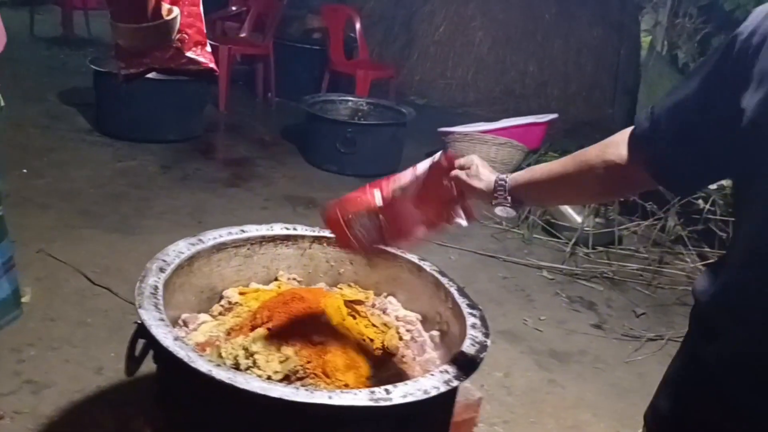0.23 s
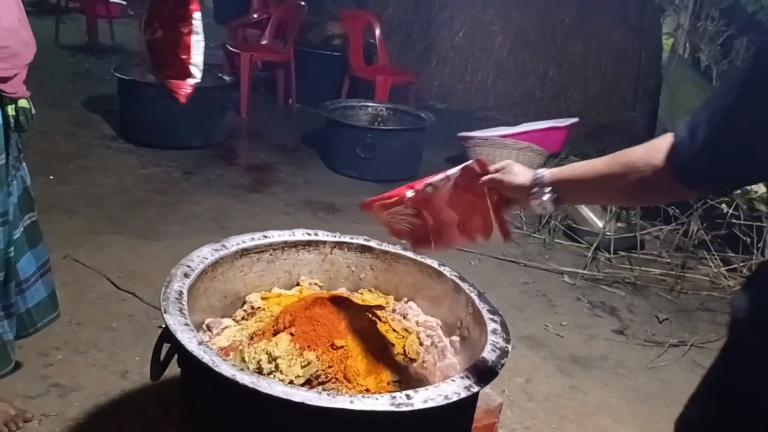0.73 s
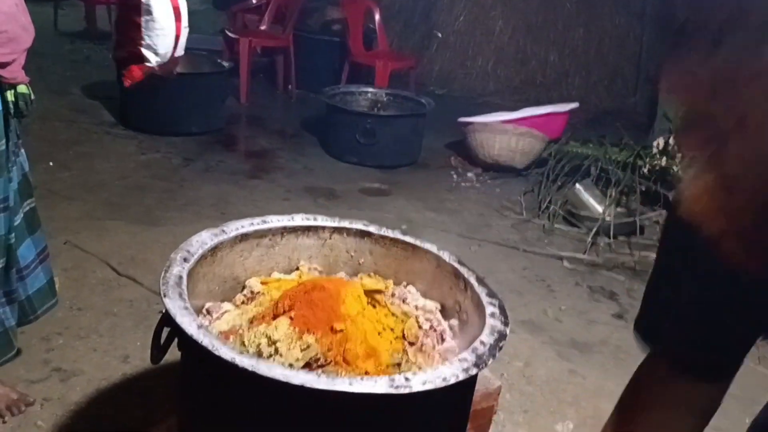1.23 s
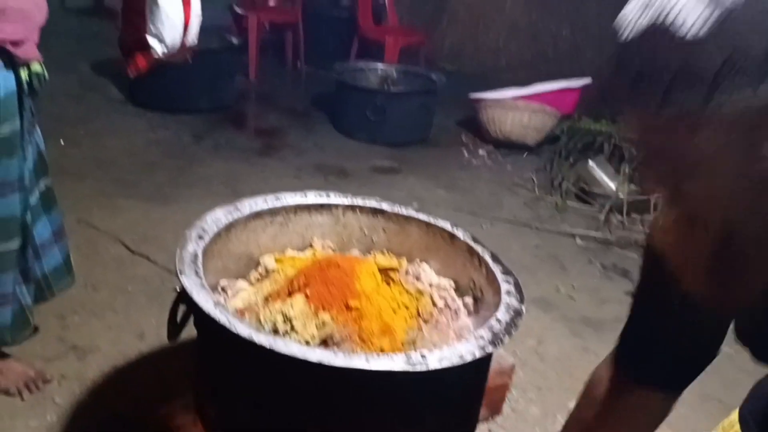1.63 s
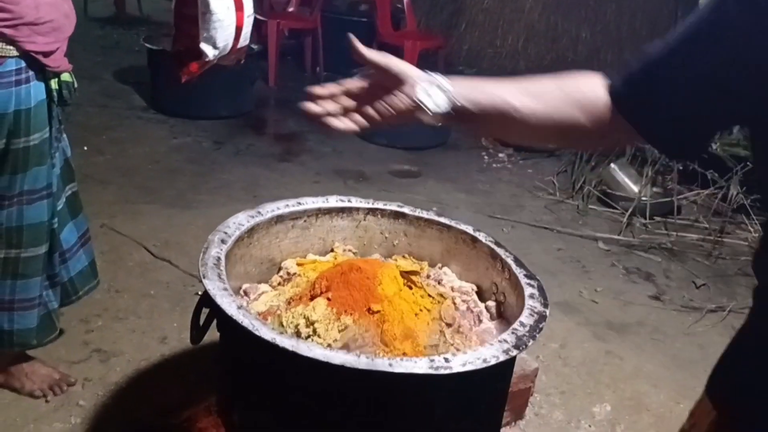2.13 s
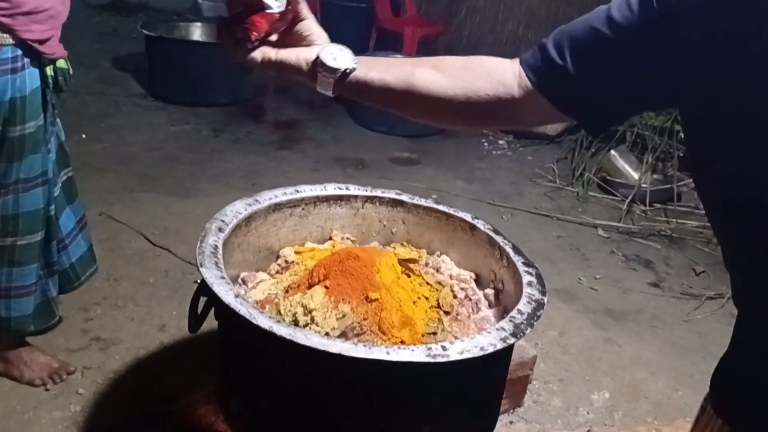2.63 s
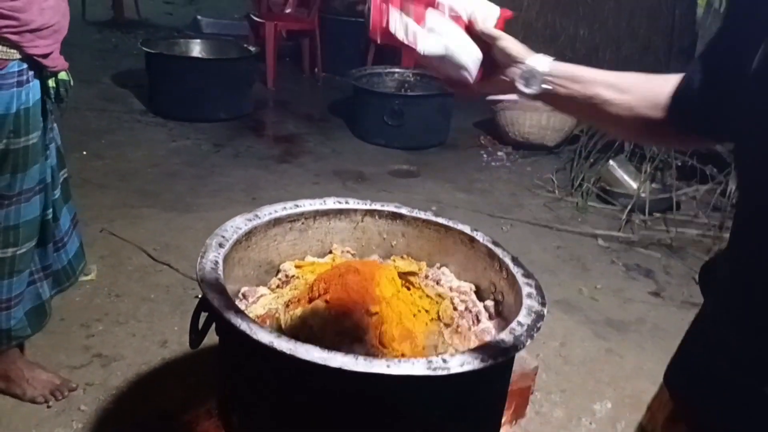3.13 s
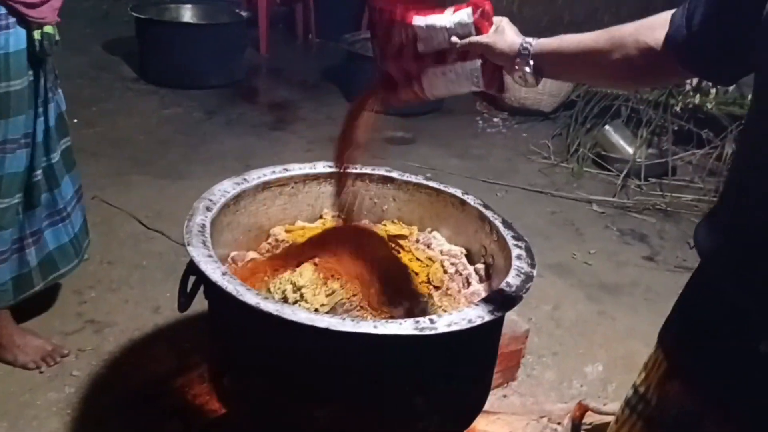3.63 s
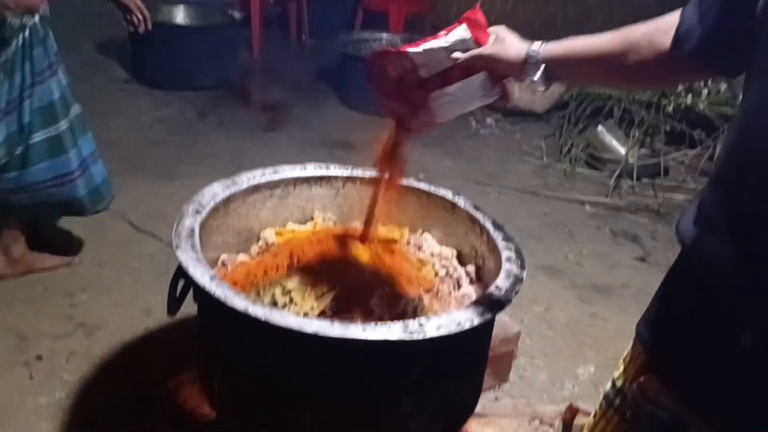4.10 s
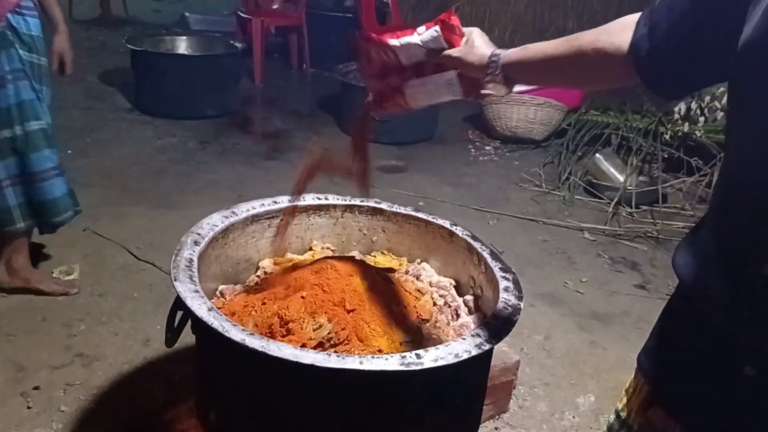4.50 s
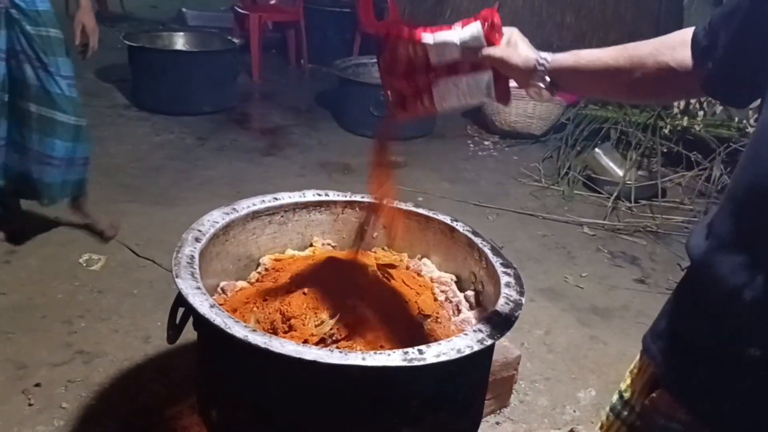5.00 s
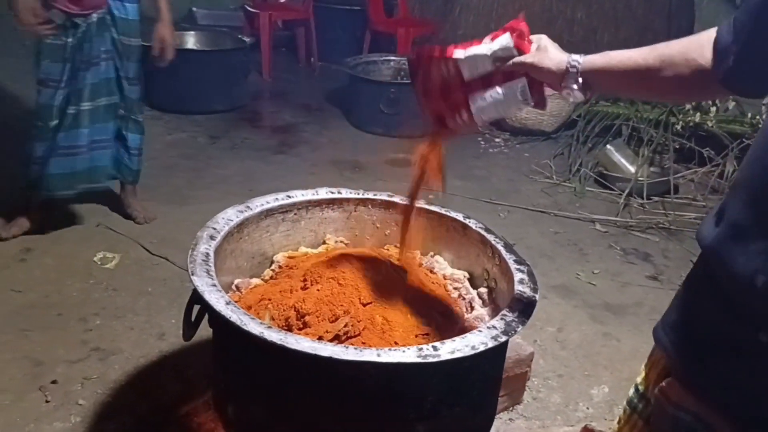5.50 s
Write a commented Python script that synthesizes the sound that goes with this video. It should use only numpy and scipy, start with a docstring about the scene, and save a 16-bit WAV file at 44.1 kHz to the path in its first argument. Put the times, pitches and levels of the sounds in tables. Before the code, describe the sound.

A quiet outdoor yard at night, heard from close up and nearly dry. From 0 to 1 second an empty plastic packet is shaken: papery rubbing and flapping, brisk swishes and faint air puffs around 0.4 to 0.5, a strong crumple near 0.28 and crisp creases snapping at about 0.13, 0.5 to 0.6 and 0.8. It fades by 1.1, leaving a low, uneven fire murmur and small woody pops. At 1.6 the packet slaps the ground in a very quick, bright run of hits, by far the loudest event, with a brief skid, film cracks and tiny spring-back rustles until 1.7. Then only sparse faint crinkles: a fuller packet is handled from 2.7 and emptied, with light ticks, the clearest at 3.55 and 4.0. Soft dull bumps come at about 3.6 and 4.1, and pops continue. Very faint, high, pulsing insect chirps come at 2.1 to 2.8 and from 5.4 to the end.

```python
"""Spice packets at the cooking fire

An empty plastic packet is shaken and slapped down on the ground; a second, full one is picked up and poured.
Film noise is showers of tiny random clicks through the colours of the film; the slaps add arches and fading sines.
Outdoors at night, behind: a murmur of shaped noise and soft crackles for the fire, small pops, dull bumps,
and an insect whose chirps, in two bouts, are sines pulsed by wing strokes. A short scatter joins the near sounds."""
import sys
import numpy as np
from scipy import signal
from scipy.fft import rfft, irfft
from scipy.io import wavfile
from scipy.ndimage import uniform_filter1d

SR = 44100
rng = np.random.default_rng(int(sys.argv[2]) if len(sys.argv) > 2 else 0)


def waveform_to_disk(signal):
    """Save audio, clipped to [-1, 1], as 16-bit WAV at the path in sys.argv[1]."""
    frames = np.transpose(np.atleast_2d(signal))
    scaled = np.clip(frames, -1, 1) * 32767
    samples = np.round(scaled).astype(np.int16)
    wavfile.write(sys.argv[1], SR, samples)


N = 253575

# Effort of shaking the empty packet, before the balance of its layers: (time [s], level [dB])
SHAKE_EFFORT = [(0, -78), (.12, -58), (.23, -68), (.31, -59.5), (.42, -57), (.56, -55), (.63, -61),
                (.70, -57), (.76, -68), (.85, -54), (.94, -65.5), (1.1, -97)]
# Turns of the wrist, the walls swish together, before trims:
# (time [s], body level [dB], body pitch [Hz], fizz level [dB], fizz pitch [Hz])
WRIST_SWISHES = [(.205, -54, 2520, -80.5, 12000), (.36, -48.5, 2800, -80, 11000),
                 (.425, -47, 2560, -74.5, 12000), (.492, -47.5, 2740, -73, 12700)]
# Air puffing out of the packet's mouth: (time [s], level [dB], pitch [Hz])
AIR_PUFFS = [(0.424, -61.5, 1130), (.505, -61.5, 900)]
# A single crease snaps through, levels before trims:
# (time [s], body level [dB], body pitch [Hz], fizz level [dB], fizz pitch [Hz], length [s])
CREASE_SNAPS = [(0.087, -58, 2530, -65.5, 13200, 0.0022), (0.1174, -51.5, 3860, -57, 10300, 0.0036),
                (0.1334, -39, 3270, -60.5, 10500, 0.0037), (0.504, -40, 2840, -73, 12000, 0.00093),
                (0.551, -43, 2880, -57.5, 13100, 0.0025), (0.5617, -36.5, 2950, -69, 12000, 0.0037),
                (0.575, -44.5, 1910, -75, 11000, 0.0011), (0.582, -45, 2320, -61, 9900, 0.002),
                (0.812, -45, 3440, -60, 10900, 0.0044), (0.874, -56, 2450, -67, 10800, 0.0025),
                (0.899, -53, 2240, -64, 10200, 0.002), (0.928, -52.5, 4300, -67, 9800, 0.0064),
                (1.021, -66, 4440, -59.5, 9900, 0.004), (1.523, -58, 2520, -75, 9000, 0.0021),
                (2.686, -64.5, 3300, -70.5, 9700, 0.0032), (3.008, -65, 3860, -52, 8830, 0.0011),
                (3.355, -60.5, 5480, -57.5, 8700, 0.0012), (3.551, -43, 4040, -63.5, 10200, 0.0014),
                (3.873, -53, 3160, -78, 9700, 0.0073), (4.005, -50, 1870, -76, 9860, 0.0038),
                (4.016, -46, 2180, -80, 11000, 0.00062), (4.303, -61.5, 2700, -69, 9220, 0.0021),
                (4.429, -51.5, 3600, -65, 8640, 0.0017), (4.523, -53.5, 2220, -69.5, 8600, 0.0026),
                (5.125, -55, 2960, -90, 9010, 0.0018)]
# The hand crumples a patch of film, levels before trims:
# (time [s], body level [dB], body pitch [Hz], fizz level [dB])
FILM_CRUMPLES = [(.257, -65, 3500, -74), (.275, -41, 3240, -62), (.285, -32, 2270, -60),
                 (.645, -59, 2870, -73), (.7, -53, 2500, -64.5), (.835, -59.5, 3380, -70),
                 (.946, -55, 4750, -71), (1.037, -68, 4900, -71), (2.661, -62, 2960, -75),
                 (2.885, -73.5, 5440, -82), (2.909, -69, 3080, -79), (2.986, -68.5, 2430, -74),
                 (3.328, -70.5, 3004, -81.5), (3.422, -70, 3360, -74.5), (3.615, -70.5, 3600, -80.5),
                 (3.796, -72, 5400, -84), (3.957, -65.5, 2730, -75.5), (4.071, -72.5, 5330, -90),
                 (4.223, -63, 3340, -75), (4.496, -69, 2800, -89)]
# Relative colour of the empty packet's film: (frequency [Hz], density [dB per Hz])
EMPTY_COLOUR = [(400, -20), (750, -16), (1100, -3), (1400, -15.5), (1800, -8.5), (2700, -4), (3900, -4.5),
                (4700, -5.5), (5150, -19), (5900, -16), (7500, -34.5), (16000, -63.5)]
# Relative colour of the full packet's film: (frequency [Hz], density [dB per Hz])
FULL_COLOUR = [(300, 2), (900, 5), (1900, 5), (2900, -1.5), (4000, 1.5), (5100, -9), (5900, -0.5),
               (7700, -22), (16000, -37)]
# Relative colour of the film's high fizz: (frequency [Hz], density [dB per Hz])
FIZZ_COLOUR = [(3000, -43.5), (5700, -12), (7800, -6.5), (8700, 0), (9700, 7), (10800, -1.5), (12500, -1.5),
               (15500, -10)]
# Resonances of the empty packet's hollow: (frequency [Hz], width [Hz], lift [dB])
HOLLOW_RESONANCES = [(1555, 230, 16), (1987, 190, 9.5), (2620, 49, 5.5), (3250, 200, 5.5)]
# The packet hits the ground and flops over: (time [s], level [dB], length [s])
GROUND_SLAPS = [(1.585, -36.5, 0.0025), (1.5904, -18.5, 0.0054), (1.5968, -18.5, 0.0074),
                (1.606, -28, 0.0072), (1.635, -33.5, 0.0042)]
# Skids just before and after the slaps: (time [s], level [dB], length [s])
GROUND_SKIDS = [(1.579, -41, 0.017), (1.608, -34.5, .029)]
# Tonal colour of the quick run of slaps, fading sines before their trim and build-up:
# (frequency [Hz], level [dB], t60 [s])
SLAP_TONES = [(347, -52, 0.17), (1048, -48.5, 0.24), (1230, -50, 0.24), (1344, -40, 0.12),
              (1564, -38.5, 0.12), (1800, -44.5, .09), (1996, -24.5, 0.052), (2340, -26, 0.11),
              (2550, -30.5, 0.13), (2580, -14.5, 0.0084), (2670, -26.5, .08), (3100, -23.5, .05),
              (3240, -28.5, 0.097), (3693, -19, 0.026)]
# The film cracks under the hardest slaps: (time [s], peak level [dB])
FILM_CRACKS = [(1.5915, -41.5), (1.5994, -30.5)]
# The dropped packet springs back: (time [s], level [dB], length [s])
SPRING_BACKS = [(1.648, -52.5, 0.01), (1.672, -49, 0.0065), (1.701, -55.5, 0.015)]
# Relative colour of film scraping the ground: (frequency [Hz], density [dB per Hz])
SCUFF_COLOUR = [(40, -67.5), (330, -23), (900, -29.5), (1300, -11), (1450, -24), (1700, -12.5),
                (2750, -4.5), (3700, -21.5), (4250, -26.5), (4850, -23), (6300, -33), (10400, -34.5),
                (15500, -55)]
# Small pops, likely from the fire: (time [s], peak level of the note [dB], pitch [Hz])
FIRE_POPS = [(1.238, -56.5, 1550), (1.369, -61, 716), (1.45, -55, 2480), (2.0483, -57, 1700),
             (2.087, -52, 1910), (2.1022, -56, 1810), (3.508, -66, 646), (3.5724, -52.5, 1530),
             (3.763, -63.5, 1870), (4.063, -61.5, 1210), (5.219, -59.5, 1667), (5.281, -57, 620),
             (5.532, -56.5, 730), (5.678, -59.5, 1900)]
# Dull bumps, before a final lift: (time [s], level [dB], pitch [Hz])
DULL_BUMPS = [(.627, -60, 220), (1.522, -57, 338.7), (3.289, -58, 333), (3.561, -51.5, 356),
              (4.056, -49.5, 314), (4.264, -57.5, 372), (5.364, -54, 228)]
# Chirps of the insect, the first of each bout softer: (time [s], level [dB])
INSECT_CHIRPS = [(2.119, -87), (2.235, -80), (2.338, -79), (2.467, -78), (2.593, -78.5), (2.738, -81.5),
                 (5.378, -83.5), (5.495, -79.5), (5.604, -78), (5.725, -82)]
# Relative colour of the fire and the yard: (frequency [Hz], density [dB per Hz])
MURMUR_COLOUR = [(40, -33.5), (75, -13.5), (100, -2.5), (135, -8), (230, -1), (390, 1), (490, -9.5),
                 (720, -7), (1300, -16), (2600, -16.5), (4200, -31), (6500, -42), (9500, -40.5),
                 (15500, -43)]

SWAP_S = 2  # the empty packet before this time, the full one after
LEAD_S = 0.1  # time for a crackle to swell before its crest
CREASE_DB = 4  # rms variation of colour from crease to crease
SWISH_LENGTH_S, PUFF_S = 0.024, 0.024  # PUFF_S is half the length of a puff
# a crumple lasts CRUMPLE_S at CRUMPLE_AT_DB, and half as long for every HALVING_DB above
CRUMPLE_S, CRUMPLE_AT_DB, HALVING_DB = 0.011, -60.5, 31.5
CRUMPLE_FIZZ_HZ = 9600
CHIRP_HZ, CHIRP_LENGTH_S = 4710, 0.11
FIRST_LOWER = 0.05  # share by which the first of a bout is lower
STROKES_PER_S, STROKE_SAG = 86, 0.065  # typical wing-stroke rate, share of the pitch lost over each
CHIRP_BLUR_S = 0.021  # scatter of the chirps in the yard
MURMUR_DB = -67  # level of the rush
EDGE_HZ = 15900  # upper limit of the sound's band
TIME = np.arange(N) / SR
GRID = abs(np.fft.fftfreq(2048, 1 / SR)) + 1  # Hz of each filter bin, nudged off zero


def amp(db):
    """Decibels to gain."""
    return 10 ** (np.asarray(db) / 20)


def unit(x):
    """Scales to rms 1."""
    return x / np.sqrt(np.mean(x ** 2) + 1e-30)


def peaked(x):
    """Scales to peak 1."""
    return x / (np.max(abs(x)) + 1e-30)


def read(points, hz):
    """Reads a spectrum on a log-frequency axis."""
    f, db = np.transpose(points)
    return np.interp(np.log(hz + 1), np.log(f + 1), db)


def add(mix, s, sound):
    """Mixes a sound in at time s, trimmed to fit."""
    at = round(s * SR)
    sound = sound[max(-at, 0):]
    part = mix[max(at, 0):][:len(sound)]
    part += sound[:len(part)]


def through(x, response):
    """Passes x through an impulse response."""
    return signal.oaconvolve(x, response)[:len(x)]


def causal(db):
    """The causal (minimum-phase) impulse response of a spectrum given in dB on the GRID."""
    log_spectrum = np.conj(signal.hilbert(np.log(amp(db))))
    return np.fft.ifft(np.exp(log_spectrum)).real[:len(GRID) // 2]


def resonate(x, hz, width):
    """A band-pass resonance of gain 1 at its centre."""
    b, a = signal.iirpeak(hz, hz / width, SR)
    return signal.lfilter(b, a, x)


def resonate_twice(x, hz, width):
    """Two equal resonances in a row, for steeper sides."""
    return resonate(resonate(x, hz, width), hz, width)


def burst(length, size=4096):
    """A puff of tiny slips that dies away over the given length."""
    decay = np.exp(-np.arange(size) / SR / max(length, 1 / SR))
    return rng.standard_normal(size) * decay


def grains(size, per_s, spread_db):
    """Dense tiny clicks, mostly small and a few large."""
    height = amp(spread_db * np.minimum(rng.exponential(1, size), 4))
    happens = rng.random(size) < per_s / SR
    return height * rng.standard_normal(size) * happens


def shaking(rub_db=-9, rub_spread_db=2.0, flap_db=-15, flap_hz=520, fizz_db=-27):
    """The empty packet's walls rub, crinkle and flap with the effort, and swish and puff at turns of the wrist."""
    times, effort_db = np.transpose(SHAKE_EFFORT)
    effort = amp(np.interp(TIME, times, effort_db)) * (TIME < times[-1])
    rub = unit(through(grains(N, per_s=1500, spread_db=rub_spread_db), causal(hollow_film())))
    flap = unit(resonate(resonate(rng.standard_normal(N), flap_hz, 550), flap_hz, 560))
    fizz = unit(through(grains(N, per_s=4700, spread_db=3.5), causal(read(FIZZ_COLOUR, GRID))))
    out = effort * (amp(rub_db) * rub + amp(flap_db) * flap + amp(fizz_db) * fizz)
    for s, db, hz, swish_fizz_db, fizz_hz in WRIST_SWISHES:
        add(out, s - LEAD_S, crinkle(s, db, hz, swish_fizz_db, fizz_hz, SWISH_LENGTH_S))
    for s, db, hz in AIR_PUFFS:
        air = unit(resonate_twice(rng.standard_normal(N), hz, hz / 3))
        out += amp(db) * air * np.exp(-((TIME - s) / PUFF_S) ** 2)
    return out


def crinkles():
    """Snaps are over at once; crumples swell and fade, the quicker the harder the hand presses."""
    out = np.zeros(N)
    for s, db, hz, fizz_db, fizz_hz, length in CREASE_SNAPS:
        add(out, s - LEAD_S, crinkle(s, db, hz, fizz_db, fizz_hz, length))
    for s, db, hz, fizz_db in FILM_CRUMPLES:
        length = CRUMPLE_S * 2 ** ((CRUMPLE_AT_DB - db) / HALVING_DB)
        add(out, s - LEAD_S, crinkle(s, db, hz, fizz_db, CRUMPLE_FIZZ_HZ, length))
    return out


def crinkle(s, body_db, body_hz, fizz_db, fizz_hz, length, body_focus_db=8, fizz_focus_db=17, note_db=8):
    """A body note and a fizz, both coloured by the crease that happens to give way."""
    film = hollow_film() if s < SWAP_S else read(FULL_COLOUR, GRID)
    note = note_db / (1 + ((GRID / body_hz - 1) / 0.09) ** 2)
    body = film + focus(body_hz, body_focus_db, reach=1.3) + note + CREASE_DB * ripple(size=6)
    fizz = read(FIZZ_COLOUR, GRID) + focus(fizz_hz, fizz_focus_db, reach=0.88) + CREASE_DB * ripple(size=26)
    body_sound = crackle(length, body, spread_db=2.5, settle_db=-8.5, settle_s=0.04)
    fizz_sound = crackle(length, fizz, spread_db=6.5, settle_db=-7.5, settle_s=0.02)
    return amp(body_db - 1.5) * body_sound + amp(fizz_db) * fizz_sound


def crackle(length, spectrum_db, spread_db, settle_db, settle_s):
    """A cloud of buckles swells to its crest at LEAD_S, fades, and goes on settling for a while."""
    t = np.arange(SR // 3) / SR - LEAD_S
    away = np.where(t < 0, -t / 0.73, t)  # the rise is quicker than the fall
    crest = np.exp(-away / length)
    buckles = grains(len(t), per_s=11000, spread_db=spread_db) * crest
    settle_fade = np.exp(-away / settle_s) * (t > -2 * length)
    settling = grains(len(t), per_s=5100, spread_db=4.5) * settle_fade
    cloud = through(unit(buckles) + amp(settle_db) * unit(settling), causal(spectrum_db))
    return unit(cloud) * np.sqrt(np.mean(crest ** 2))  # longer crackles carry more energy


def hollow_film(lowest_hz=200):
    """The spectrum of the empty packet: film lifted at the resonances of its hollow, too small to carry bass."""
    lift = sum(db / (1 + (2 * (GRID - hz) / width) ** 2) for hz, width, db in HOLLOW_RESONANCES)
    bass_loss = 10 * np.log10(1 + (lowest_hz / (GRID + 20)) ** 4)
    return read(EMPTY_COLOUR, GRID) + lift - bass_loss


def focus(hz, depth_db, reach):
    """Lowers a spectrum away from hz, down to a shelf at reach (octaves squared)."""
    return -depth_db * np.minimum(np.log2(GRID / hz) ** 2, reach)


def ripple(size):
    """Random humps across the spectrum, rms 1, some bins wide."""
    noise = rng.standard_normal(len(GRID) // 2)
    humps = unit(uniform_filter1d(uniform_filter1d(noise, size), size))
    return np.interp(GRID, np.linspace(0, SR / 2, len(humps)), humps)


def landing(slap_hz=2730, build_s=0.0033, scuff_db=-10, tones_db=-1, crack_hz=4700):
    """Slaps swell and die in a few ms and scuff the ground, with fading tones; the film skids, cracks and unfolds."""
    out, t = np.zeros(N), np.arange(SR // 4) / SR
    ground = causal(read(SCUFF_COLOUR, GRID))
    ground = ground / np.linalg.norm(ground)

    def swell(length):
        """One arch of the given length."""
        return np.sin(np.pi * np.minimum(t / length, 1))

    def scuff(length):
        """The film scrapes the ground for that long, dying down."""
        scrape = np.sqrt(abs(swell(length))) * np.exp(-t / length / 2)
        return through(scrape * unit(grains(len(t), per_s=12000, spread_db=0.0)), ground)

    for s, db, length in GROUND_SLAPS:
        slap = swell(length) * np.sin(2 * np.pi * slap_hz * t)
        add(out, s, amp(db) * (slap + amp(scuff_db) * scuff(length)))
    for s, db, length in GROUND_SKIDS:
        add(out, s, amp(db) * scuff(length))
    tones = sum(amp(db - 60 * t / t60) * np.sin(2 * np.pi * hz * t) for hz, db, t60 in SLAP_TONES)
    add(out, 1.591, amp(tones_db) * tones * (1 - np.exp(-t / build_s)))
    for s, db in FILM_CRACKS:
        add(out, s, amp(db) * peaked(resonate(burst(0.0022), crack_hz, 1200)))
    for s, db, length in SPRING_BACKS:
        body = crackle(length, read(SCUFF_COLOUR, GRID), spread_db=1.5, settle_db=-7, settle_s=0.03)
        fizz = crackle(length, read(FIZZ_COLOUR, GRID), spread_db=4.5, settle_db=-9.5, settle_s=0.02)
        add(out, s - LEAD_S, amp(db) * body + amp(-72) * fizz)
    return out


def pops(pop_s=0.0028, width=0.18, knock_db=-4, knock_hz=1500):
    """Short woody pops from under the pot: a broad knock and a brief note."""
    out = np.zeros(N)
    for s, db, hz in FIRE_POPS:
        note = resonate_twice(burst(pop_s), hz, width * hz)
        knock = resonate_twice(burst(pop_s), knock_hz, knock_hz)
        add(out, s, amp(db) * (peaked(note) + amp(knock_db) * peaked(knock)))
    return out


def bumps(swell_s=0.0033):
    """Soft low blows: sines that swell quickly and die within a few cycles."""
    out, t = np.zeros(N), np.arange(SR // 8) / SR
    swell = t / swell_s * np.exp(1 - t / swell_s)
    for s, db, hz in DULL_BUMPS:
        add(out, s, amp(db + 2.0) * swell * np.sin(2 * np.pi * hz * t))
    return out


def insect(jitter=0.25, direct=1.2):
    """Each chirp is a trill of wing strokes that hold one pitch and then drop a little, blurred by the yard."""
    out, t = np.zeros(N), np.arange(0, CHIRP_LENGTH_S, 1 / SR)
    pauses = np.diff([0] + [s for s, db in INSECT_CHIRPS])
    for (s, db), pause in zip(INSECT_CHIRPS, pauses):
        starts_bout = pause > 1
        hz = CHIRP_HZ * (1 - FIRST_LOWER * starts_bout)
        uneven = unit(uniform_filter1d(rng.standard_normal(SR), size=300))[:len(t)]
        stroke = np.cumsum(STROKES_PER_S * np.exp(jitter * uneven)) / SR % 1  # 0 to 1 through each stroke
        level = abs(np.sin(np.pi * t / CHIRP_LENGTH_S)) ** 0.6 * np.sin(np.pi * stroke)
        pitch = hz * (1 - STROKE_SAG * stroke ** 3)
        chirp = level * np.sin(2 * np.pi * np.cumsum(pitch) / SR)
        chirp = np.pad(chirp, (0, len(t)))  # room for the blur to die away
        blurred = unit(through(chirp, burst(CHIRP_BLUR_S)))
        add(out, s, amp(db) * unit(direct * unit(chirp) + blurred))
    return out


def embers(per_s=9, level_db=-80.0):
    """Faint, soft crackles at random moments, each pitched by the stick that gives way."""
    sticks = np.zeros(N)
    for hz in np.geomspace(700, 2700, num=9):  # per_s counts the cracks of each stick
        cracks = rng.uniform(-0.67, 1, N) * (rng.random(N) < per_s / SR)
        sticks += unit(resonate(through(cracks, burst(0.008)), hz, hz / 8))
    softener = signal.butter(4, 3800, fs=SR, output="sos")
    return amp(level_db) * unit(signal.sosfilt(softener, sticks))


def murmur(patchy_db=2.5, hollow_hz=340):
    """The low, uneven rush of the fire as patchy shaped noise, with a soft hollow note."""
    hz, _, z = signal.stft(rng.standard_normal(N), SR, nperseg=512, noverlap=384)
    # smooth over frequency, then over time
    patches = uniform_filter1d(rng.standard_normal(z.shape), size=7, axis=0)
    patches = unit(uniform_filter1d(patches, size=9, axis=1))
    z = z * amp(patchy_db * patches / (1 + (hz[:, None] / 5000) ** 2))  # steadier in the treble
    uneven = signal.istft(z, nperseg=512, noverlap=384)[1][:N]
    colour = amp(read(MURMUR_COLOUR, np.fft.rfftfreq(N, 1 / SR)))
    rush = unit(irfft(rfft(uneven) * colour, N))
    hollow = unit(resonate(resonate(rng.standard_normal(N), hollow_hz, 140), hollow_hz, 160))
    return amp(MURMUR_DB) * (rush + amp(-13.5) * hollow)


def yard(x, t60=0.072):
    """A faint, short scatter from the ground and nearby walls: decaying noise as an echo."""
    t = np.arange(SR // 3) / SR
    tail = rng.standard_normal(len(t)) * amp(-60 * t / t60) * (t > 0.004)
    return through(x, tail / np.linalg.norm(tail))


def scene():
    """The packets close by, the fire and the insect behind."""
    film = shaking() + crinkles()
    slap = landing()
    fire = pops() + bumps() + embers()
    wet = yard(amp(-12.5) * film + amp(-17.5) * slap + amp(-5.0) * fire)
    return (film + slap + fire + wet + insect() + murmur())[None]


def record(dry):
    """Limits the band with a steep linear-phase low-pass at EDGE_HZ."""
    low_pass = signal.firwin(401, EDGE_HZ, window=("kaiser", 8), fs=SR)
    return signal.oaconvolve(dry, low_pass[None], "same")


dry = scene()
out = record(dry)
waveform_to_disk(out)
```